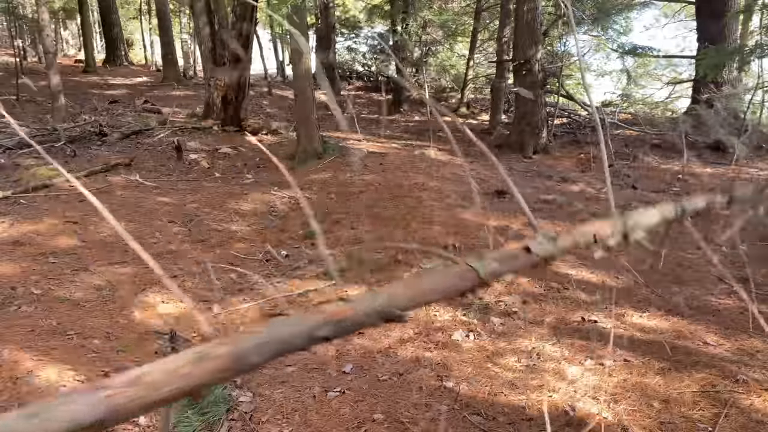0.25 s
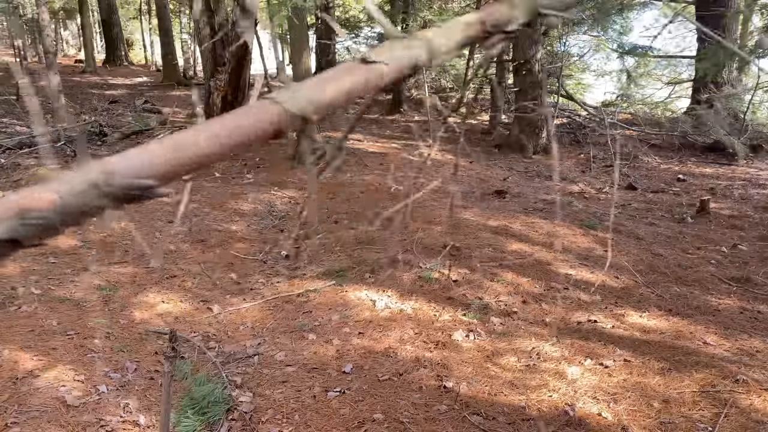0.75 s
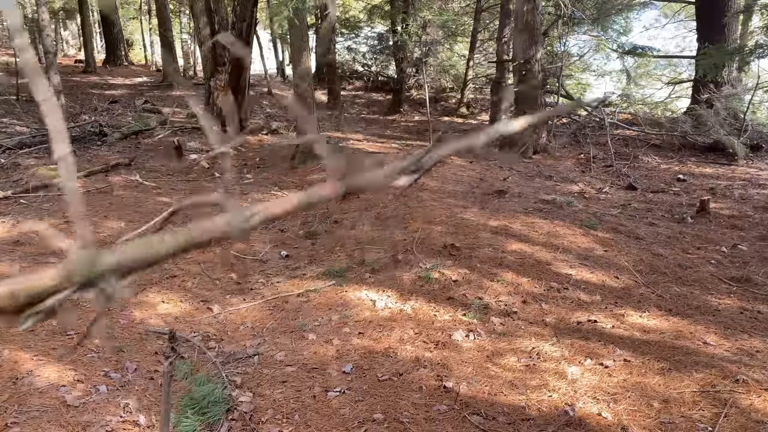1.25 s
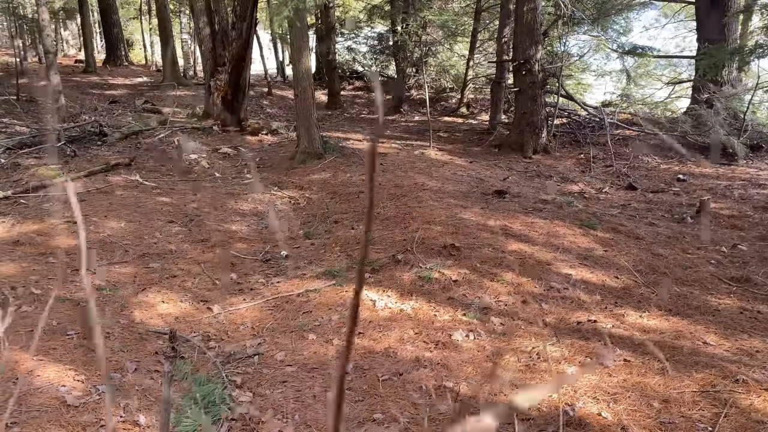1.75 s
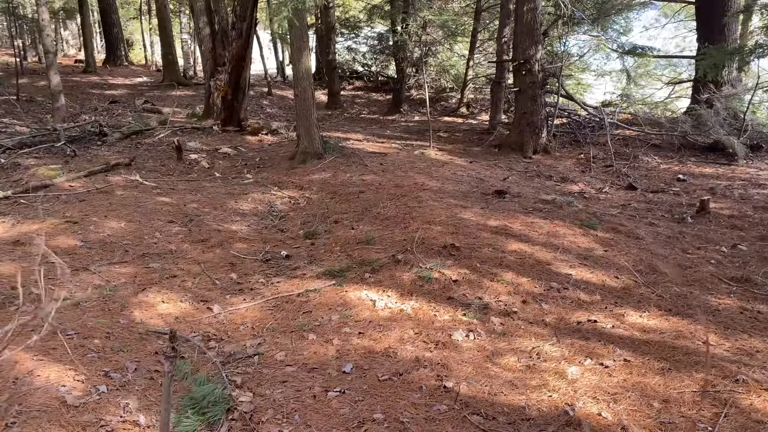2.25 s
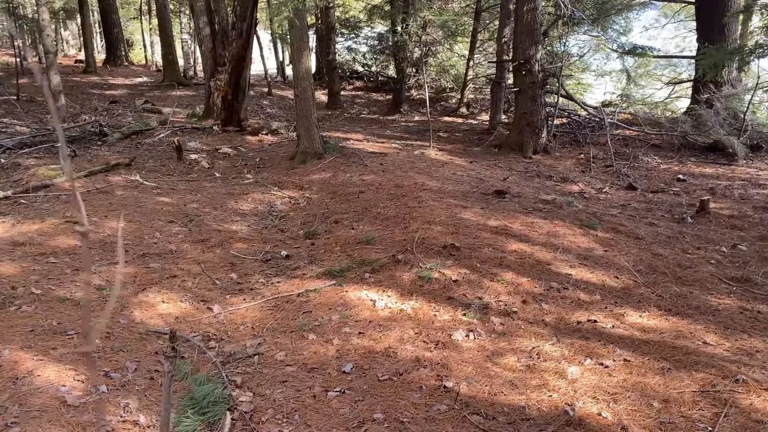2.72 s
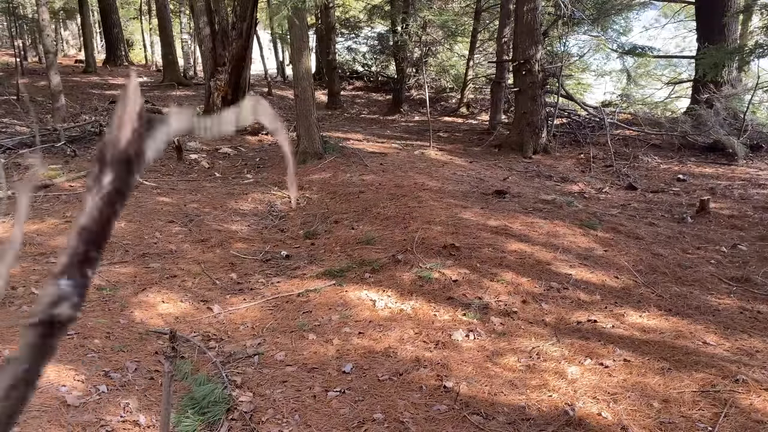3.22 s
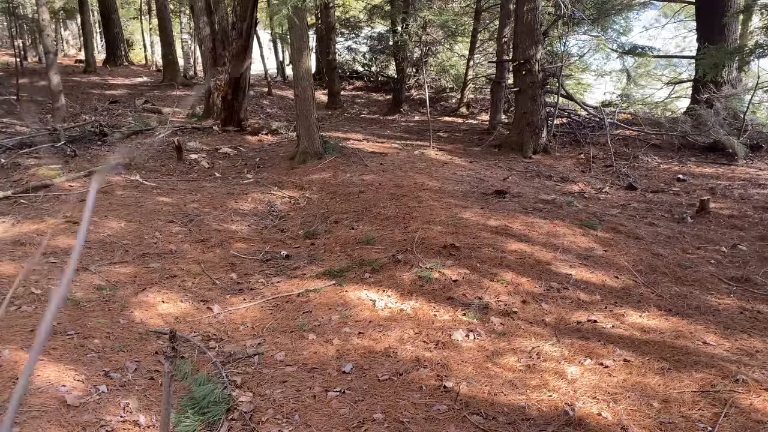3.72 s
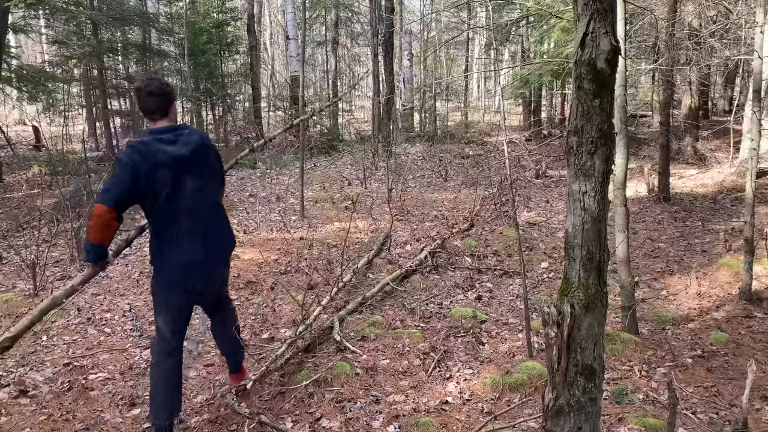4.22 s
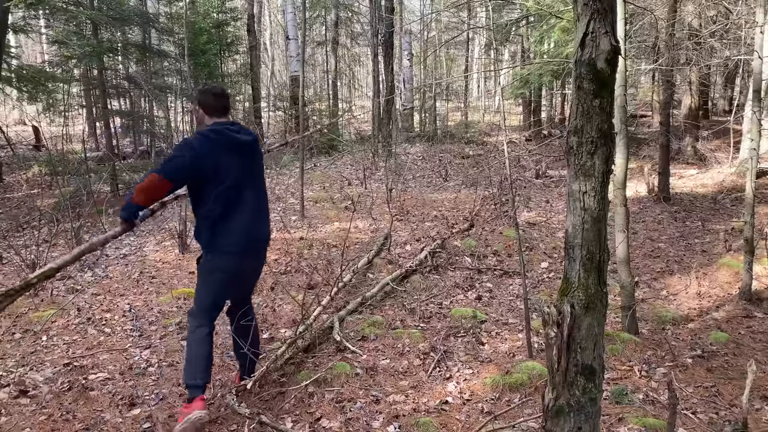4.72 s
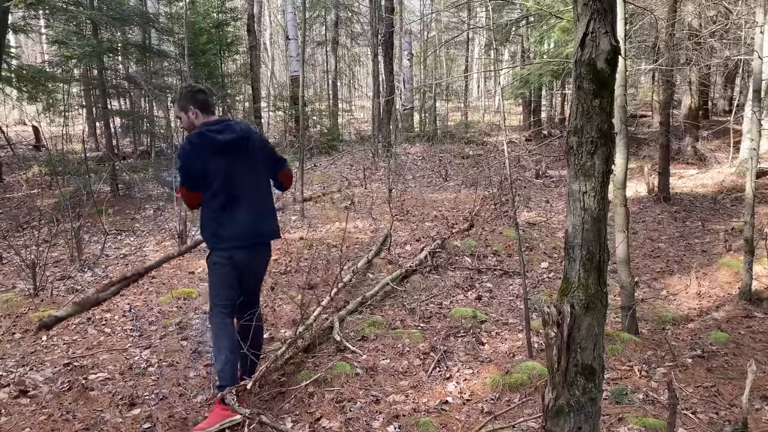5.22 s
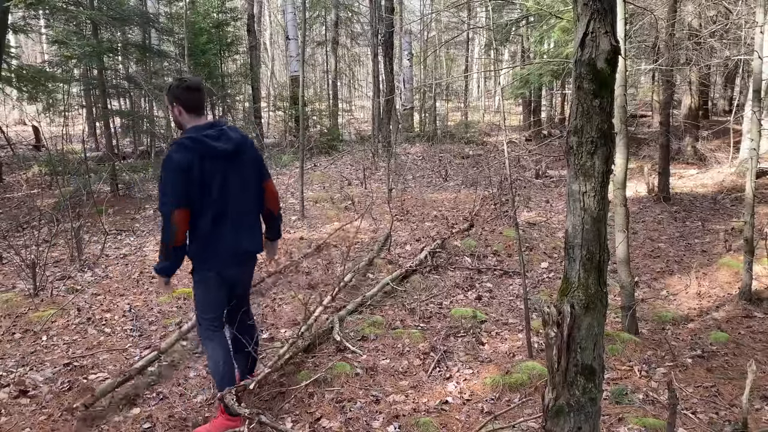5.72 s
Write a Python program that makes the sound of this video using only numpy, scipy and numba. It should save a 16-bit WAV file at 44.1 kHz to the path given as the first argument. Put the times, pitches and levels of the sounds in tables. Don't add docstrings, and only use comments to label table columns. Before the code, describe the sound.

Long dead branches drag close by through dry leaves and needles with snapping twigs, then a heavy thump cuts to fainter, more distant rustling and steps.

```python
import sys
import numpy as np
from scipy import signal
from scipy.fft import rfft, irfft, next_fast_len
from scipy.io import wavfile
from scipy.ndimage import uniform_filter1d, map_coordinates
from numba import njit

SR = 44100
rng = np.random.default_rng(int(sys.argv[2]) if len(sys.argv) > 2 else 0)


def magnitude_from_level(level_db):
    exponent = np.asarray(level_db, float) / 20
    return 10 ** exponent


def persist_wave(psi):
    counts = np.round(np.clip(psi, -1, 1) * 32767).astype(np.int16)
    wavfile.write(sys.argv[1], SR, np.atleast_2d(counts).T)


N = 263096
CUT_S = 3.976
BASS_LAG = 1.6

# low_hz, high_hz
MATERIAL_BANDS = [(40, 250), (300, 1500), (1800, 6000), (6500, 15500)]
PORT_LAG = [(16.42, 5.1), (5.7, 8.6)]


def colour(table, hz):
    curve_hz, curve_db = np.array(table)[:, 0], np.array(table)[:, 1]
    return np.interp(np.log(np.maximum(hz, 1)), np.log(curve_hz), curve_db)


def across(hz, centres, columns):
    place = np.interp(np.log(hz), np.log(centres), np.arange(len(centres)))
    return map_coordinates(np.array(columns), [place, np.arange(len(hz))], order=1, mode="nearest")


def walk(rate):
    hold = int(SR / rate)
    levels = rng.standard_normal(N)[:N // hold + 1]
    return uniform_filter1d(np.repeat(levels, hold)[:N], hold // 2)


def slips(rate, fade_s):
    jumps = (rng.random(N) < rate / SR) * rng.exponential(size=N)
    out = signal.lfilter([1], [1, -np.exp(-1 / (fade_s * SR))], jumps)
    return (out - out.mean()) / out.std()


def lag_at(s, chance, lags=PORT_LAG):
    mean, spread = (column[(s > CUT_S) * 1] for column in np.transpose(lags))
    return mean + spread * chance


@njit
def rings(start, lag, hz, t60, left, right):
    out = np.zeros((2, N + 8192))
    for g in range(len(start)):
        pole = np.exp((2j * np.pi * hz[g] - np.log(1000.) / t60[g]) / SR)
        z, soft = 1 + 0j, 1.
        a = int(start[g])
        b = max(a + int(lag[g]), 0)
        for i in range(min(int(t60[g] * SR * .7), 8000)):
            z *= pole
            soft *= np.exp(-4 * hz[g] / SR)
            out[0, a + i] += left[g] * z.imag * (1 - soft)
            out[1, b + i] += right[g] * z.imag * (1 - soft)
    return out[:, :N]


def swells(table, colours_db, s):
    power = np.zeros((len(colours_db), len(s)))
    peaks = [-1] + [row[0] for row in table] + [99]
    for k, ((peak, db, rise, fall, *_), own_db) in enumerate(zip(table, np.transpose(colours_db))):
        shape_db = db - 20 * np.where(s < peak, (peak - s) / rise, (s - peak) / fall)
        same_scene = (s > CUT_S) == (peak > CUT_S)
        heard = (s > peaks[k]) & (s <= peaks[k + 2]) & same_scene
        power += magnitude_from_level(shape_db + own_db[:, None]) ** 2 * heard
    return power


def litter_db(when):
    # peak_s, level_db, rise_s per 20 dB, fall_s per 20 dB, weight_on_wood_db
    tugs_near = [(.04, -42, .12, .3, -2), (.225, -33, .08, .22, 0), (.343, -40, .15, .08, -6),
                 (.45, -55, .3, 1.5, -3), (.914, -42, .035, .055, -3), (1.018, -39, .05, .25, -1),
                 (1.185, -33, .09, .2, -3), (1.245, -38, .1, .025, 8), (1.289, -34, .04, .45, 2),
                 (1.469, -29.5, .1, .06, 3), (1.52, -39, .1, .6, 0), (1.656, -32.5, .03, .7, 8),
                 (1.822, -35, .12, .4, 4), (2.127, -40, 2.5, 1.5, 0), (2.307, -38, .15, .3, 3),
                 (2.518, -39, .4, .25, 1), (2.71, -38, .3, .3, -3), (2.764, -34, .1, .15, -4),
                 (2.86, -35, .15, .2, -3), (2.925, -38, .15, .4, -2), (3.057, -42, .3, .2, 7),
                 (3.229, -41.5, .45, .05, -6), (3.412, -50, .08, 1.5, -18), (3.62, -42, .07, .8, -8),
                 (3.716, -43.5, .45, .12, 1), (3.811, -34, .05, .1, -11), (3.887, -41, .08, .045, 7),
                 (3.965, -57, .15, .2, 1)]
    # peak_s, level_db, rise_s per 20 dB, fall_s per 20 dB,
    # weight_on_wood_db
    tugs_far = [(4.103, -60, .01, .5, 6), (4.14, -48, .012, .5, 11), (4.2, -48, .3, .1, -2),
                (4.345, -43.5, .14, .2, -9), (4.565, -53, .08, .3, 5), (4.642, -48, .2, .33, -12),
                (4.95, -52, .02, .15, 5), (5.049, -55, .2, .3, -14), (5.109, -53, .2, .25, -2),
                (5.25, -53.5, .45, .6, -5), (5.385, -51, .1, .5, 4), (5.468, -33, .03, .45, 1),
                (5.535, -41, .6, .08, 3), (5.585, -42, .05, .15, -2), (5.67, -49, .1, .6, 3),
                (5.871, -43.5, .09, .2, -7)]
    # peak_s, level_db, rise_s per 20 dB, fall_s per 20 dB
    footfalls = [(.225, -44, .05, .6), (.345, -43, .45, .11), (.55, -62, .45, .6), (.918, -55, .1, .1),
                 (1.04, -44, .05, .07), (1.41, -46, .14, .4), (1.668, -41, .17, .2), (2.0, -47, .3, .3),
                 (2.46, -44, .1, .15), (2.92, -50, .6, .25), (3.12, -52, .15, .3), (3.241, -48, .15, .04),
                 (3.53, -55, .4, .1), (3.72, -42, .07, .2), (3.8, -42, .09, .25), (3.96, -49, .3, .2),
                 (4.62, -56, .45, .45), (4.87, -61, .06, .45), (5.33, -62, .15, .1), (5.52, -38, .045, .2),
                 (5.727, -40, .08, .12), (5.93, -54, .1, .3)]
    # soil_db, twigs_db, leaves_db, needles_db
    still_db = [(-72, -64, -66, -66), (-76, -72, -75, -66)]
    # near_db, far_db
    needles_db = (-1.5, 2.5)

    s = np.arange(0, N / SR + .002, .001)
    tugs = np.vstack([tugs_near, tugs_far])
    weight = tugs[:, 4]
    needles = np.array(needles_db)[(tugs[:, 0] > CUT_S) * 1]
    soil = swells(footfalls, np.zeros((1, len(footfalls))), s)
    dragged = swells(tugs, [weight, 0 * weight, needles], s)
    power = np.vstack([soil, dragged]) + magnitude_from_level(np.array(still_db)[(s > CUT_S) * 1].T) ** 2
    return [np.interp(when, s, 10 * np.log10(p)) for p in power]


def rustle(cycles=5.88, scatter_db=2.5, patchy_db=1.7, smear_s=.0012, tint_db=4.5, count=9, per_s=3000):
    # pitch_hz, level_db
    litter_tone = [(35, -10.5), (80, 0), (150, -5.5), (330, -14.5), (700, -2), (1100, 2.5), (1550, -2),
                   (3000, 3), (5000, 4.5), (7500, 5.5), (12000, 7), (16500, 6.5)]

    cracks = int(per_s * N / SR)
    when = rng.random(cracks) * N / SR
    size = magnitude_from_level(scatter_db * np.minimum(rng.exponential(size=cracks), 3.0))
    size /= np.sqrt(np.mean(size ** 2))
    place = rng.standard_normal(cracks)
    when, size, place = (np.repeat(v, count) for v in (when, size, place))
    hz = rng.uniform(35, 16800, len(when))
    at = (when * SR).astype(int)

    levels = litter_db(when)
    swell = np.minimum(slips(35., 0.011), 2.2)
    patches = [patchy_db * (swell + 0.79 * slips(40., 0.03) + 0.9 * walk(45.))[at] for _ in levels]
    low, high = np.transpose(MATERIAL_BANDS)
    share = per_s * count / 16800 * cycles / (4 * np.log(1000)) * np.log(high / low)
    per_ring = [db + patch - 10 * np.log10(p) for db, patch, p in zip(levels, patches, share)]
    size = size * magnitude_from_level(across(hz, np.sqrt(low * high), per_ring) + colour(litter_tone, hz) - 0.62)

    tint = np.cos(2 * np.pi * (1.1 * np.log2(hz) + .6 * walk(18.)[at]))
    size *= magnitude_from_level(tint_db * tint - .5)
    longer = 1 + 1.6 * (hz < 1400)
    size *= longer ** -.5 * rng.choice([-1., 1.], len(when))

    start = np.minimum((when + smear_s * rng.exponential(size=len(when))) * SR, N)
    lag = lag_at(when, place) * np.where(hz < 1000, BASS_LAG, 1)
    time_left = np.where(when < CUT_S, CUT_S - when + .002, 1)
    t60 = np.minimum(longer * cycles / hz, time_left)
    return rings(start, lag, hz, t60, size, size)


def knock_rows():
    # start_s, pitch_hz, level_db, rise_s, ring_out_s
    wood = [(2.303, 680, -30.5, .0053, .09), (2.513, 430, -32, .0097, .07), (3.04, 850, -35, .02, .069),
            (3.8857, 664, -6, .0078, .0089), (3.885, 1400, -15, .007, .011),
            (3.8935, 1500, -14, .0008, .004), (3.89, 1020, -13, .002, .008), (4.1, 1120, -55, .004, .069),
            (4.134, 1130, -16, .0015, .02), (4.135, 1130, -17, .006, .012), (4.145, 700, -29, .004, .03),
            (4.134, 800, -21, .002, .02), (3.926, 1750, -44, .003, .02), (3.944, 1780, -45, .006, .04),
            (4.137, 545, -34, .0029, .078), (4.172, 1080, -37, .012, .05), (4.158, 1150, -36, .004, .03),
            (4.556, 730, -48.5, .003, .05), (4.945, 813, -38, .004, .07), (5.1, 865, -52, .02, .071),
            (5.195, 740, -53, .011, .11), (5.352, 700, -50, .01, .08), (5.38, 780, -47, .01, .06),
            (5.25, 740, -52, .012, .3), (5.415, 1150, -33, .0061, .058), (5.458, 425, -35, .0091, .2),
            (5.498, 424, -38, .0028, .042), (5.661, 995, -35, .0018, .03), (5.76, 770, -48, .011, .068)]
    # start_s, first_hz, last_hz, level_db, ring_out_s
    thuds = [(.243, 520, 220, -33, .035), (.278, 450, 240, -34, .03), (.338, 440, 313, -31, .032),
             (1.401, 716, 406, -22, .025), (1.473, 500, 80, -30, .055), (3.2311, 490, 109, -23, .038),
             (3.813, 350, 252, -31.5, .027), (3.8942, 620, 500, -6, .012), (3.8962, 427, 89, -3, .098),
             (3.898, 60.4, 45, -6, .126), (4.417, 603, 400, -33, .03), (4.63, 95, 89, -50, .11),
             (4.71, 95, 80, -54, .15), (5.513, 150, 75.6, -28.5, .16), (5.554, 90, 68, -26, .24),
             (5.701, 130, 93.3, -37, .27), (5.89, 85, 72, -39, .24)]
    wood_sag = .975
    thud_rise_cycles = .75

    return ([(s, hz, hz * wood_sag, db, rise, t60) for s, hz, db, rise, t60 in wood]
            + [(s, hz, last_hz, db, thud_rise_cycles / hz, t60) for s, hz, last_hz, db, t60 in thuds])


def knocks(glide_s=.0024, rough=.14, rubbed=.5, rough_hz=180.):
    out = np.zeros((2, N + SR))
    t = np.arange(SR // 3) / SR
    uneven = np.r_[walk(rough_hz), np.zeros(SR)]
    for s, first_hz, last_hz, db, rise, t60 in knock_rows():
        a = int(s * SR)
        turns = last_hz * t + (first_hz - last_hz) * glide_s * (1 - np.exp(-t / glide_s))
        contact = np.sin(np.pi / 2 * np.clip(t / rise, 0, 1))
        decay = magnitude_from_level(-60 * np.maximum(t - rise, 0) / t60)
        tone = magnitude_from_level(db) * contact * decay * np.sin(2 * np.pi * turns)
        tone *= 1 + (rough if db > -30 else rubbed) * uneven[a:a + len(t)]
        tone[int((CUT_S - s) * SR) if s < CUT_S else len(t):] = 0
        lag = int(lag_at(np.array(s), 0) * (BASS_LAG if last_hz < 420 else 1))
        out[0, a:a + len(t)] += tone
        out[1, a + lag:a + lag + len(t)] += tone
    return out[:, :N]


def snap_rows():
    # start_s, level_db, thickness_db,
    # ring_out_ms
    twig_breaks = [(.4033, -47.5, -4.5, 4.5), (.6164, -47, -7, 4.8), (.677, -46.5, -1.5, 3.7),
                   (.8272, -48.5, 2, 13), (.8368, -44, 7.5, 12), (.9035, -39, 2.5, 11),
                   (1.015, -43, -1, 4.2), (1.0858, -32, -3, 8.7), (1.1644, -31.5, -5, 3.2),
                   (1.1718, -34.5, 0, 5.4), (1.1853, -21.5, 1.5, 4.1), (1.2395, -36, -3, 3.6),
                   (1.2792, -21, -13, 5), (1.2911, -17.5, -8, 3.5), (1.307, -24, -9, 6.7),
                   (1.3563, -18, -7, 9.7), (1.4194, -25.4, -11, 6.9), (1.4575, -20.5, -20, 5.6),
                   (1.4637, -29.5, -3.5, 2.1), (1.4721, -15.5, 2, 7), (1.526, -27, -1.5, 6.4),
                   (1.566, -34.5, -11, 3.2), (1.6514, -24, 5, 6), (1.659, -26.5, 3, 11),
                   (1.672, -28, 2, 6.3), (1.7229, -17.5, 1.5, 6.5), (1.7768, -17.5, -6, 4.1),
                   (1.8548, -27.5, -16, 7),
                   (1.8839, -24, 2, 6), (1.9385, -34, 3, 8.5), (2.1185, -18.5, -4, 3.8),
                  (2.1323, -28, 8, 6.6), (2.179, -32.5, -1.5, 5.4), (2.2889, -10, -22, 1.3),
                  (2.4258, -32, 8.5, 3.1), (2.4346, -25, -1, 4), (2.4697, -16, -5, 6.9),
                  (2.4915, -29, -16, 2.7), (2.4954, -26, 15, 2.9), (2.5113, -22, -4.5, 7.1),
                  (2.6555, -28, -11, 3.6), (2.7047, -30, -9, 6.9), (2.715, -26.5, -20, 3.9),
                  (2.7686, -28, -12, 2.5), (2.7985, -31, 10, 3.8), (2.806, -27, -4, 2.5),
                  (2.8484, -20, -6, 4), (2.8762, -24.5, 0, 2.9), (2.9167, -32, 4.5, 7.2),
                  (3.0897, -33, -9, 7), (3.182, -34.5, -13, 8.9), (3.228, -15, -7, 2.5),
                  (3.2302, -23, 8, 2.5), (3.4009, -44, 0, 5.6), (3.419, -43, 8, 6.2),
                  (3.4698, -37.5, -2, 9.9), (3.5472, -41, 6.5, 5.8), (3.5919, -36.5, -12, 6.7),
                   (3.807, -20, -5, 4.1), (3.8303, -28, -1.5, 4.4), (3.8683, -31.5, -18, 4.3),
                  (4.1339, -17.5, -9, 4), (4.3373, -36, -5.5, 5.9), (4.4138, -25, -9, 3.7),
                  (4.5549, -40, 1, 6.9), (4.745, -43, -25, 3.2), (4.9368, -45, -20, 6.1),
                  (4.968, -46.5, -16, 6.7), (4.9937, -43, 4, 5.4), (5.2064, -42.5, -13, 8.5),
                  (5.3262, -46, -12, 5), (5.4173, -25.5, -7, 3.9), (5.4556, -14, -2, 5),
                  (5.5236, -18, -4, 2.5), (5.5769, -33, -2, 11), (5.9041, -30, -12, 2.2),
                   (.7834, -50, 8, 4), (.7917, -48, -8, 3), (.9132, -40, 10, 5), (1.2856, -22, -3, 2),
                   (1.3614, -22, 10, 5), (1.4668, -18.5, -8, 2), (1.9464, -29, 10, 4), (2.0321, -31, 2, 4),
                   (2.0596, -35, -15, 3), (2.4381, -21, -3, 4), (2.6325, -32, -2, 3), (2.7372, -33, -5, 3),
                   (2.8552, -26, 12, 6), (3.2116, -36, -8, 3), (3.6672, -37, 0, 4), (3.6753, -39, -8, 3),
                   (4.1435, -30, 2, 2.5), (5.0805, -48, 10, 2.5), (5.4618, -27, 10, 5), (5.5005, -27, 5, 4),
                   (5.8529, -39, -10, 4)]
    # start_s, level_db, thickness_db, ring_out_ms, body_over_snap_db
    sticks = [
        (.2531, -30, -8, 4, -2),
        (.3342, -31, 14, 2.4, 0),
        (1.3988, -20, -4, 3.5, -5),
        (1.7515, -31.5, -11, 3.6, 2.5),
        (2.2985, -14.5, 1, 8, -10),
        (3.066, -29, -4, 8.7, -8),
        (3.641, -35, -8, 11, -14),
        (3.8931, -25, 8, 3, 12),
        (3.9447, -44, -8, 4, -12),
        (5.6601, -36.5, -3, 10.5, -8),
    ]
    # start_s, level_db, thickness_db, ring_out_ms, body_over_snap_db
    scuffs = [
        (4.9465, -51, 15, 10, 5),
        (5.092, -54, 15, 14, 3),
        (5.192, -53, 12, 8, 3),
        (5.354, -53, 15, 12, 5),
        (5.377, -49, 15, 12, 5),
    ]
    # start_s, pitch_hz
    break_pitches = [(0.2532, 9300), (0.3345, 2710), (0.6773, 6290), (0.8371, 1720), (0.9032, 3230),
                     (0.9132, 1720), (1.0861, 8350), (1.1849, 6070), (1.2785, 7190), (1.2856, 5040),
                     (1.2911, 7620), (1.3078, 5730), (1.3555, 9350), (1.3616, 2500), (1.3992, 2280),
                     (1.4191, 11280), (1.4578, 9470), (1.472, 1770), (1.5263, 6160), (1.5669, 9950),
                     (1.6519, 3100), (1.7227, 2890), (1.7289, 9600), (1.752, 6590), (1.777, 12450),
                     (1.8566, 3700), (1.8825, 3660), (1.939, 2840), (1.9464, 2670), (2.0321, 5040),
                     (2.1187, 4690), (2.1321, 3570), (2.1799, 5300), (2.2887, 8180), (2.2984, 5430),
                     (2.3034, 1810), (2.4261, 5380), (2.4381, 6330), (2.469, 5340), (2.474, 5040),
                     (2.4917, 5730), (2.4968, 4820), (2.5116, 6980), (2.6325, 6070),
                     (2.6561, 8530), (2.7162, 5640), (2.7685, 10420), (2.7987, 4310), (2.806, 5210),
                  (2.8482, 5940), (2.8552, 4090), (2.8763, 6240), (2.9175, 5470), (3.0675, 2630),
                  (3.0931, 9690), (3.1804, 9470), (3.2278, 6030), (3.4722, 4480), (3.5917, 7710),
                  (3.6427, 7800), (3.6672, 4820), (3.8077, 4350), (3.8303, 5080), (3.8695, 11200),
                  (3.8933, 1720), (3.9447, 9820), (4.1336, 7670), (4.1389, 7490), (4.4141, 8870),
                  (4.5553, 5080), (4.9375, 9390), (4.995, 4090), (5.2067, 11070), (5.417, 12400),
                  (5.4555, 7410), (5.4618, 3790), (5.5235, 12490), (5.5769, 8870), (5.6596, 1720),
                  (5.9038, 8530)]
    twig_body_db, twig_hz, twig_db_per_octave = -15.5, 4800, 14

    twigs = [tuple(row) + (twig_body_db,) for row in twig_breaks]
    s, db, thick, ms, body = np.transpose([*twigs, *sticks, *scuffs])
    hz = np.clip(twig_hz * 2 ** (-thick / twig_db_per_octave), 2900, 11500)
    known_s, known_hz = np.transpose(break_pitches)
    nearest = abs(s[:, None] - known_s).argmin(axis=1)
    hz = np.where(abs(s - known_s[nearest]) < .004, known_hz[nearest], hz)
    return np.transpose([s, db + body, db + np.minimum(thick, 0), db - np.maximum(thick, 0), hz, ms / 1000])


def snaps(cycles=9.9, focus_db=6.5, fade_db=18.0, fibres=(18, 80, 100)):
    snap_lag = [(14, 2), (4, 1.5)]
    # from_s, to_s
    ahead = [
        (.39, .7),
        (2.42, 2.65),
        (2.79, 2.853),
        (3.46, 3.48),
        (3.94, 3.96),
    ]
    ahead_lag = 2
    bend_s_per_octave = .0008
    far_body = 2.3

    rows = snap_rows()[:, :, None]
    s, focus_hz, length = rows[:, 0], rows[:, 4], rows[:, 5]
    place = rng.standard_normal(s.shape)
    is_ahead = sum((s > a) & (s < b) for a, b in ahead)
    lag = np.where(is_ahead, ahead_lag + place, lag_at(s, place, snap_lag))
    out = 0
    for band, (low, high) in enumerate(MATERIAL_BANDS[1:]):
        count = int(fibres[band])
        step, late, sign = np.moveaxis(rng.random((len(rows), 3, count)), 1, 0)
        low = .85 * low * np.where((s > CUT_S) & (band == 0), far_body, 1)
        hz = low + (1.06 * high - low) * (np.arange(count) + step) / count
        late = late ** (1.0 + .006 / length + .4 * band)
        favour_db = focus_db * np.exp(-(np.log(hz / focus_hz) / 0.22) ** 2)
        size = magnitude_from_level(favour_db - fade_db * late) * np.sign(sign - .5)
        energy = (size ** 2 * cycles / hz).sum(axis=1, keepdims=True) / (4 * np.log(1000))
        size *= magnitude_from_level(rows[:, 1 + band] + .75 * band) * np.sqrt(length / energy)
        bend_s = bend_s_per_octave * np.clip(np.log2(8000 / hz), 0, 3)
        start = np.clip((s + 2.2 * length * late + bend_s) * SR, 0, N)
        later = lag * np.where(hz < 500, BASS_LAG, 1)
        out = out + rings(*(v.ravel() for v in (start, later, hz, cycles / hz, size, size)))
    return out


def scene():
    return rustle() + knocks() + snaps()


def band_limit(x):
    return signal.sosfilt(signal.butter(12, 17140, fs=SR, output="sos"), x)


def record(dry):
    # pitch_hz, level_db
    left_lift = [(60, 0.0), (110, 0.0), (200, 1.0), (380, 2.0), (700, 4.5), (1290, 2.5), (2380, 2.5),
                 (4400, 4.5), (8120, 0.5), (15000, 0.0)]
    # mid_hz, side_hz
    top_hz = (15850, 15150)
    spread_hz, spread_lag, spread_turn = 6200, 10, .25

    size = next_fast_len(N + 64)
    hz = np.arange(size // 2 + 1) * SR / size
    left, right = rfft(dry, size) * hz ** 2 / (hz ** 2 + 60.0 ** 2)
    lift = magnitude_from_level(colour(left_lift, hz) / 2)
    treble = np.clip((hz - spread_hz) / 900. + .5, 0, 1)
    late = -np.exp(1j * spread_turn - 2j * np.pi * hz * spread_lag / SR)
    spread_left = (1 - treble) * left * lift + treble * left * late
    spread_right = (1 - treble) * right / lift + treble * left
    dips = [1 - treble * (1 - np.clip(abs(1 + sign * late) / .7, 0, 1) ** 2.5) for sign in (1, -1)]
    mid = (spread_left + spread_right) / 2 * dips[0] * np.where(hz > top_hz[0], magnitude_from_level(-27), 1)
    side = (spread_left - spread_right) / 2 * dips[1] * np.where(hz > top_hz[1], magnitude_from_level(-36), 1)
    mix = irfft(np.array([mid + side, mid - side]), size)[:, :N]
    return band_limit(mix)


dry = scene()
out = record(dry)
persist_wave(out)
```